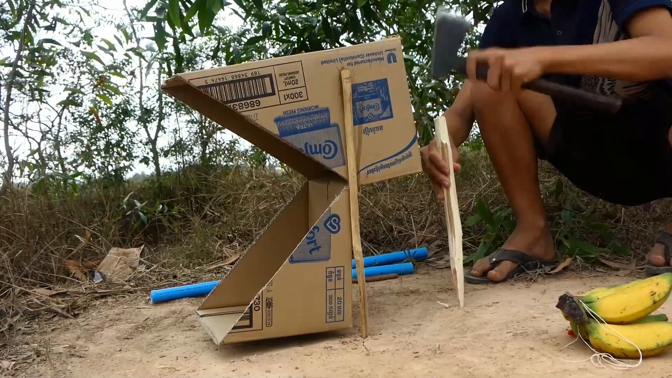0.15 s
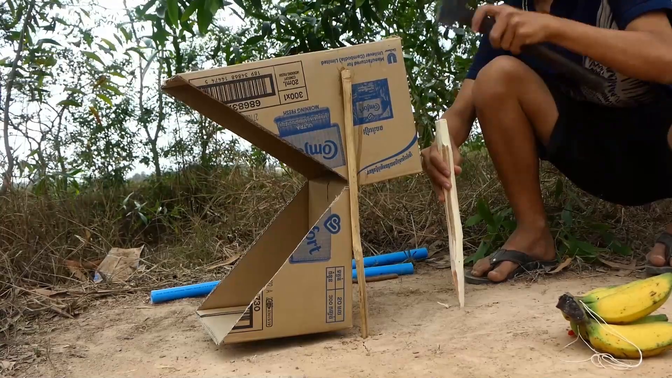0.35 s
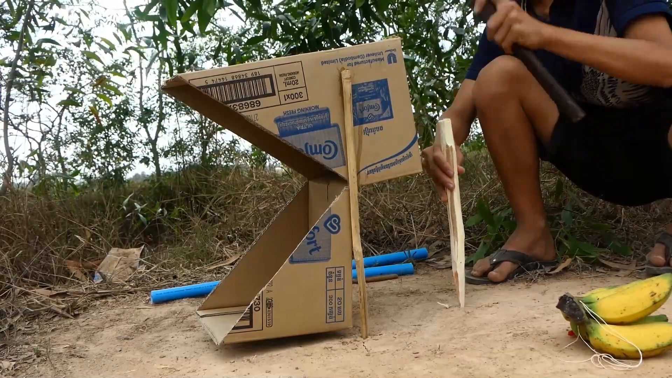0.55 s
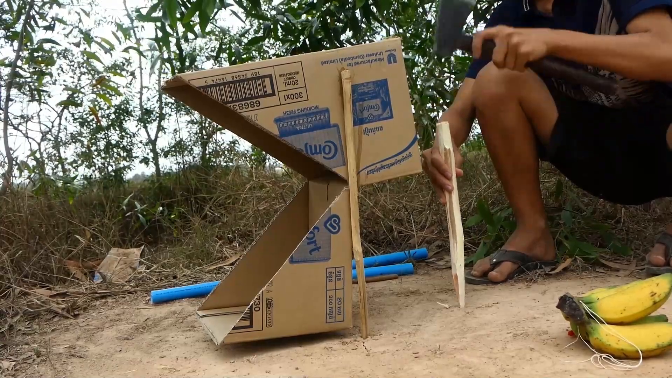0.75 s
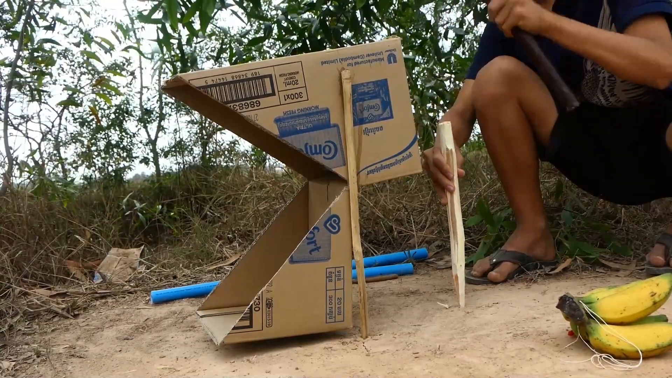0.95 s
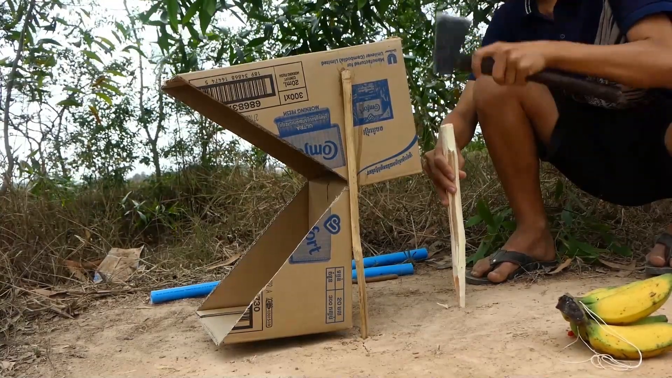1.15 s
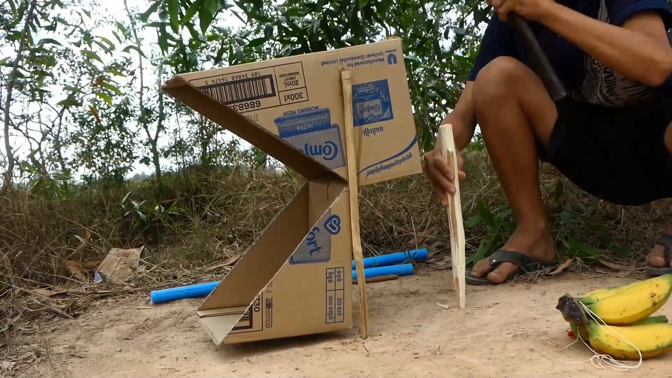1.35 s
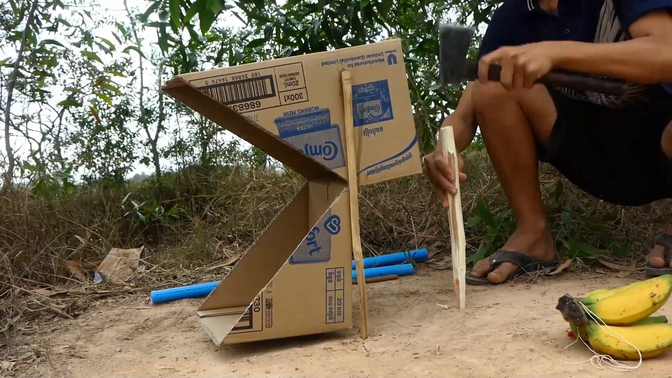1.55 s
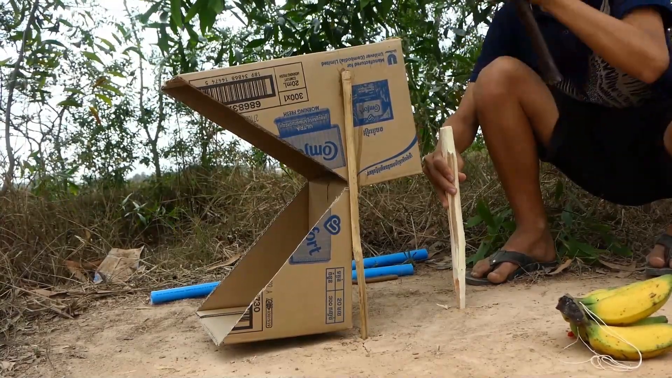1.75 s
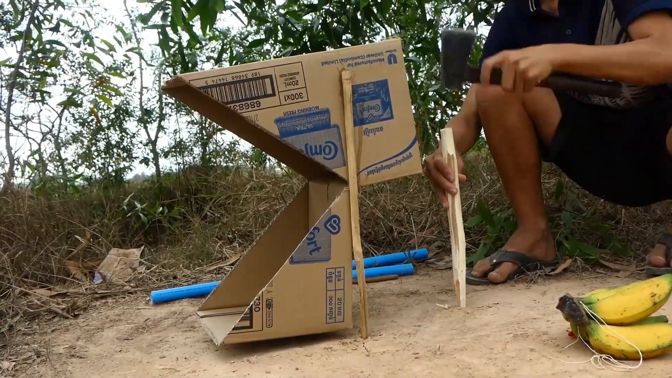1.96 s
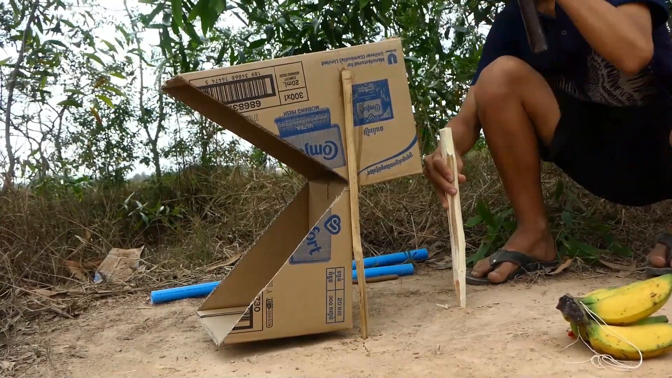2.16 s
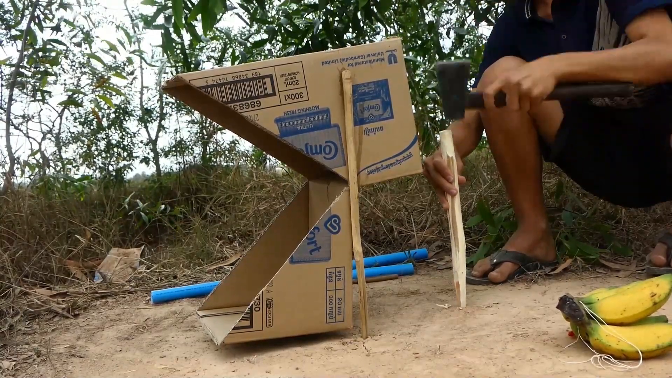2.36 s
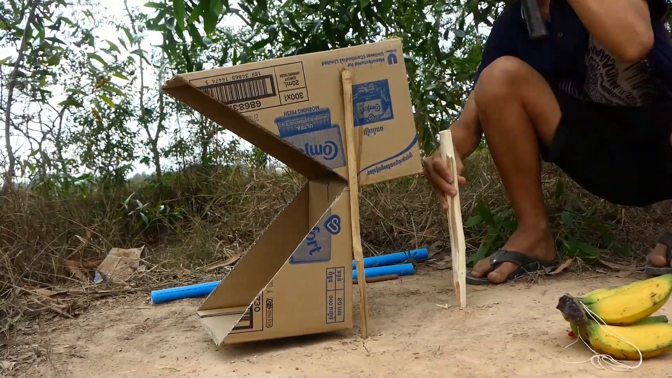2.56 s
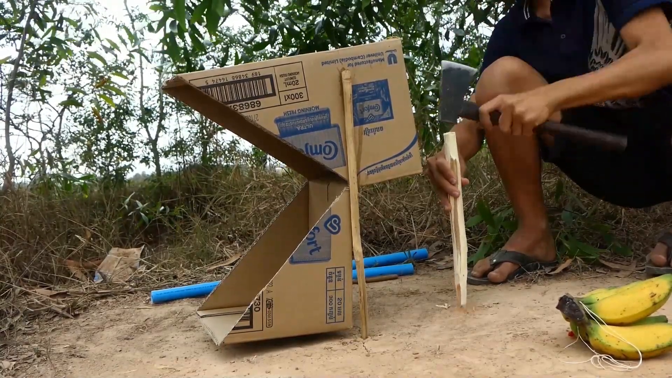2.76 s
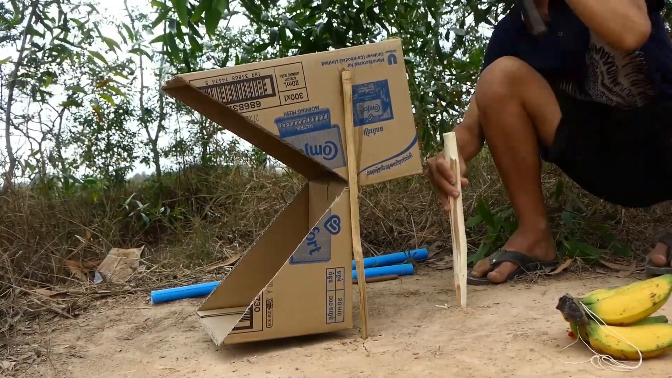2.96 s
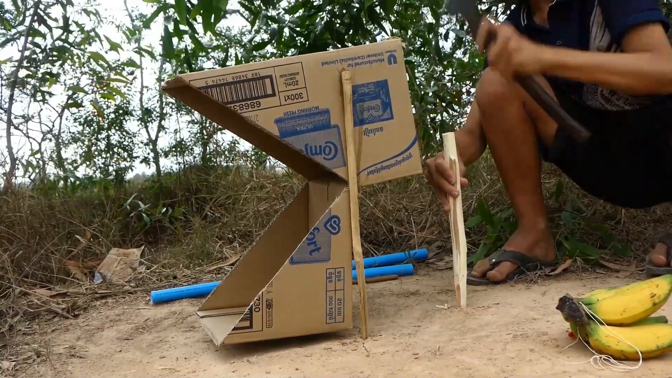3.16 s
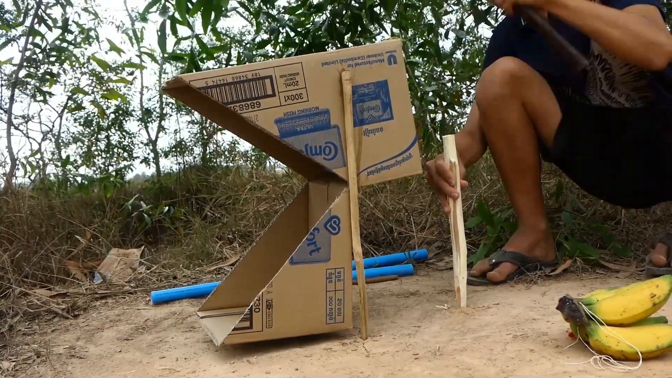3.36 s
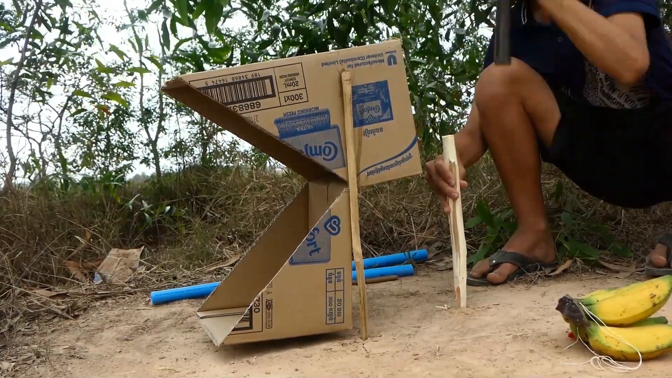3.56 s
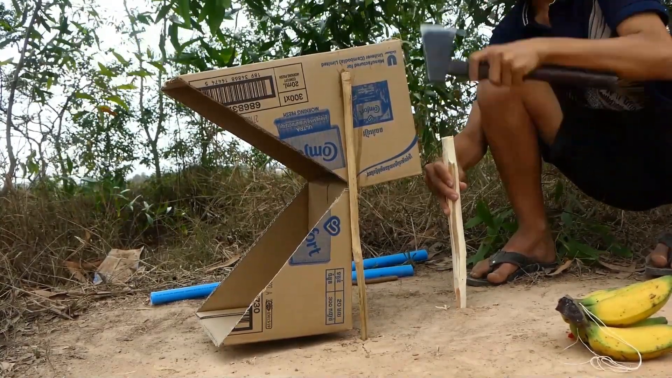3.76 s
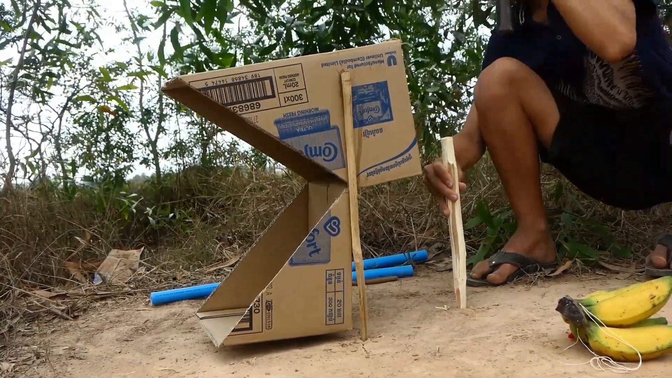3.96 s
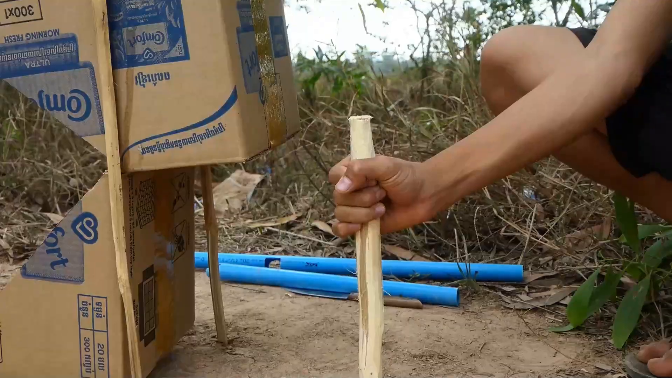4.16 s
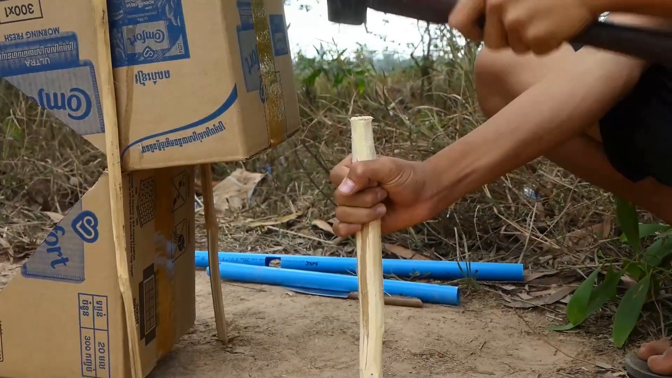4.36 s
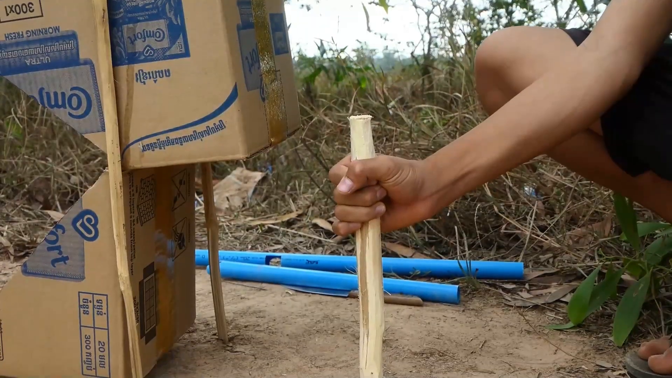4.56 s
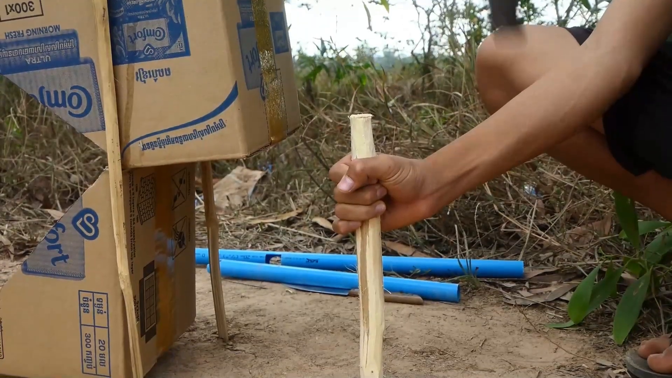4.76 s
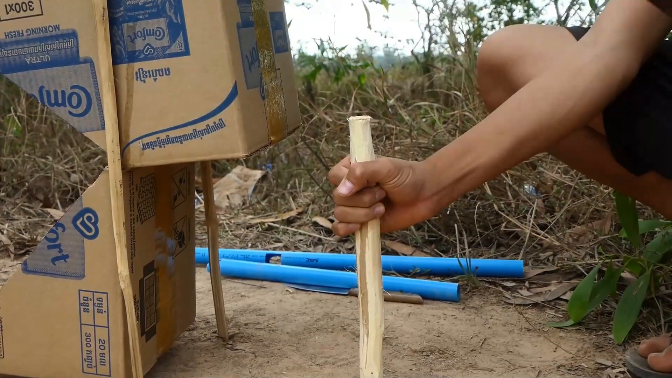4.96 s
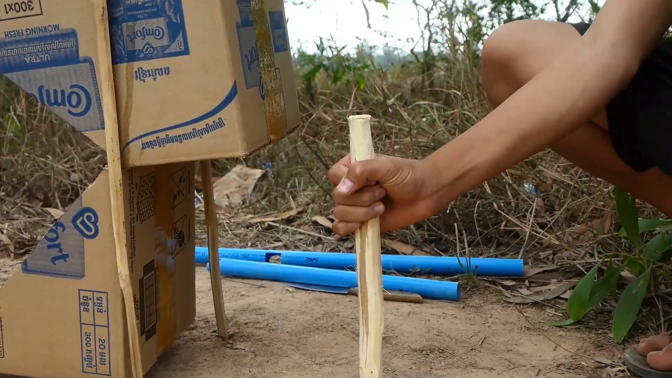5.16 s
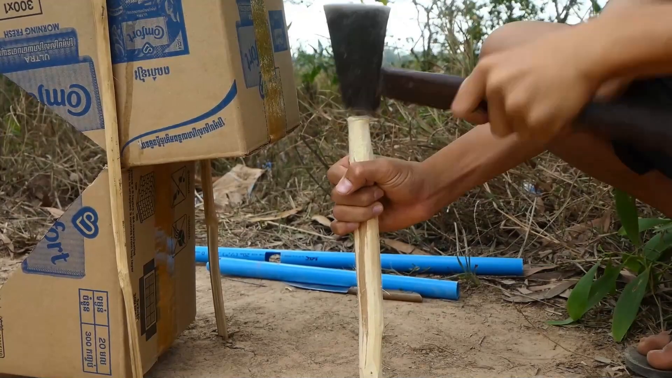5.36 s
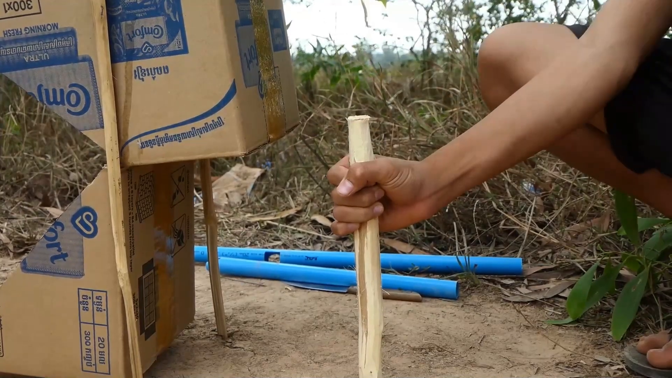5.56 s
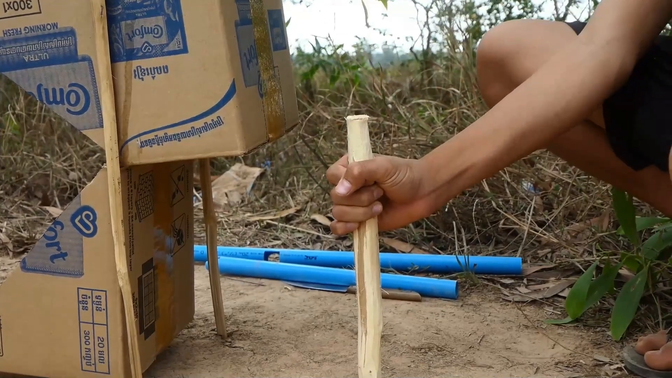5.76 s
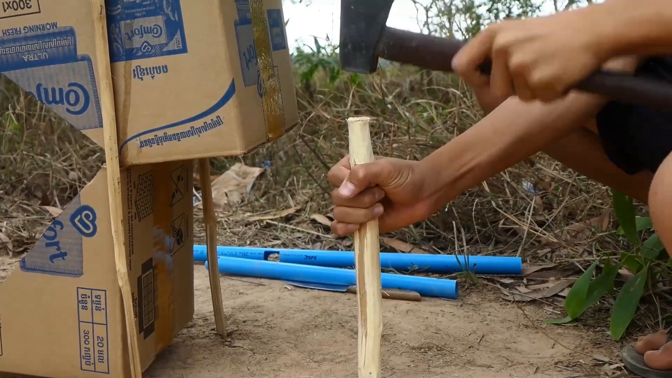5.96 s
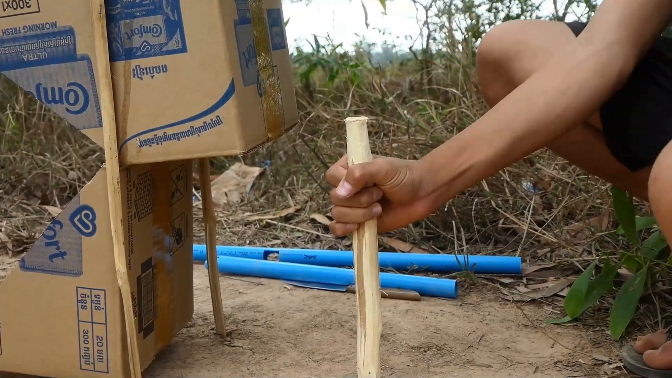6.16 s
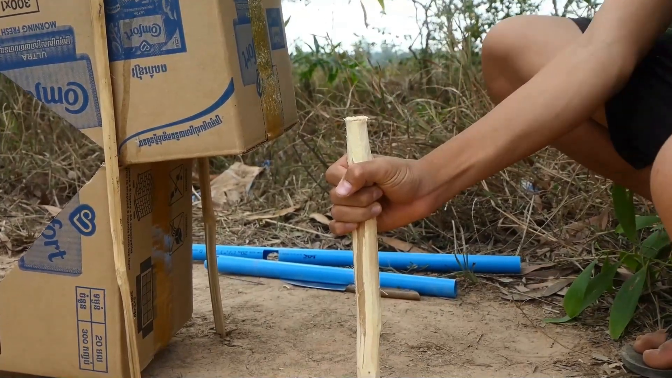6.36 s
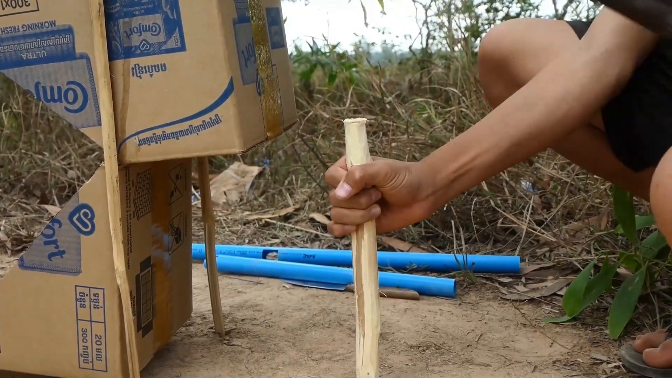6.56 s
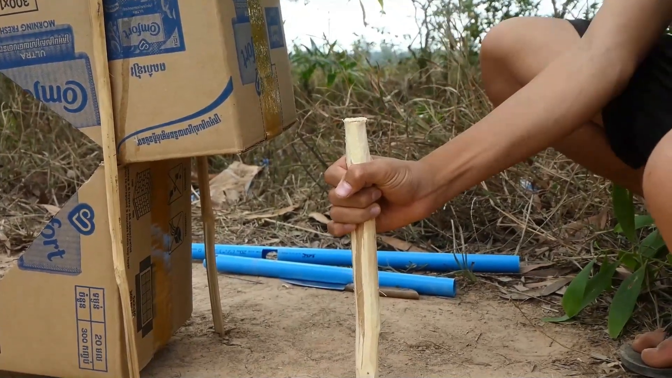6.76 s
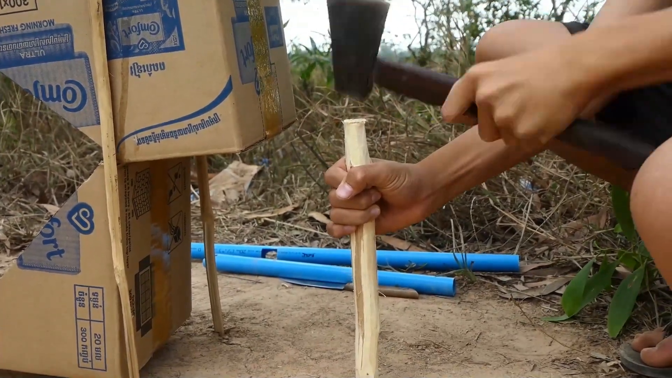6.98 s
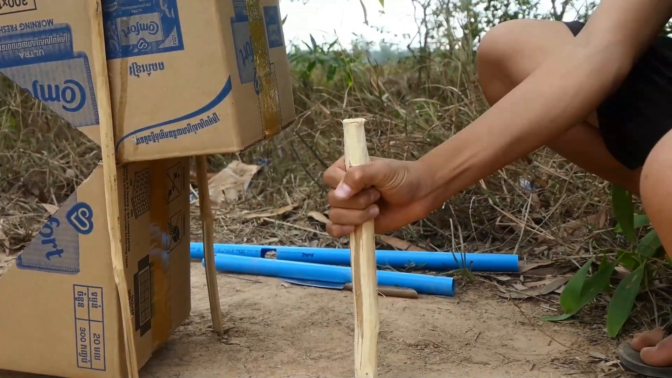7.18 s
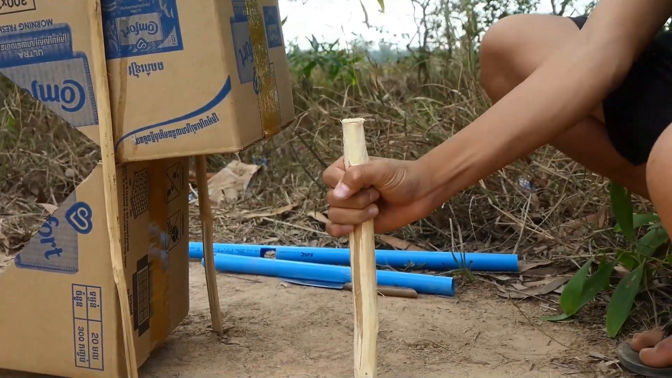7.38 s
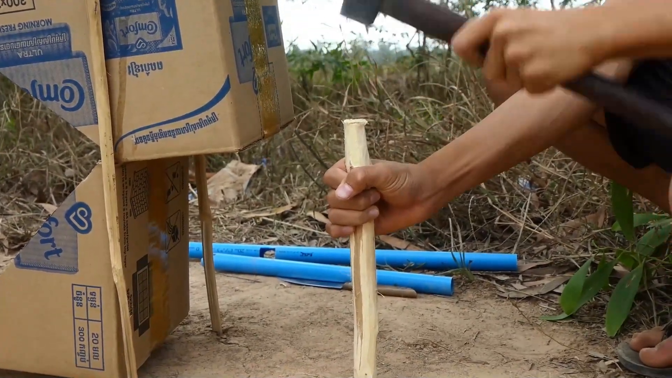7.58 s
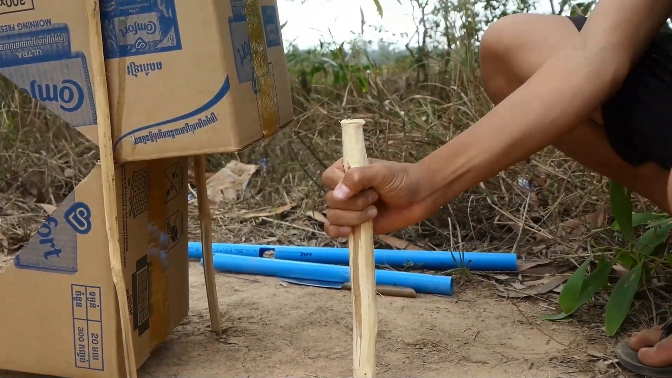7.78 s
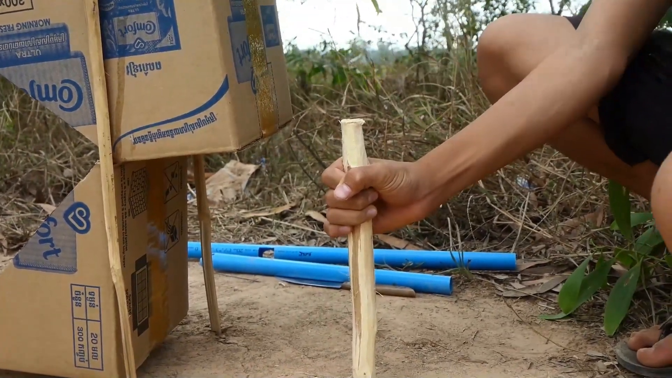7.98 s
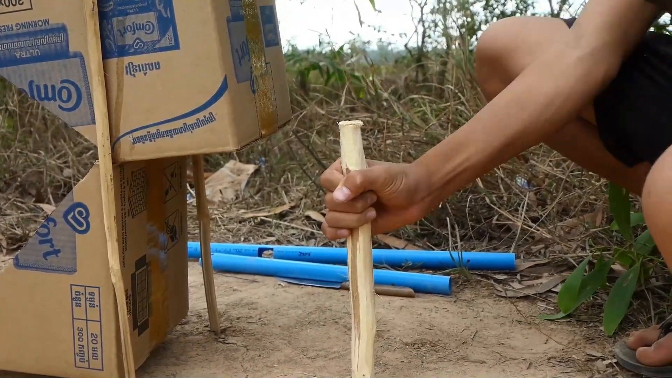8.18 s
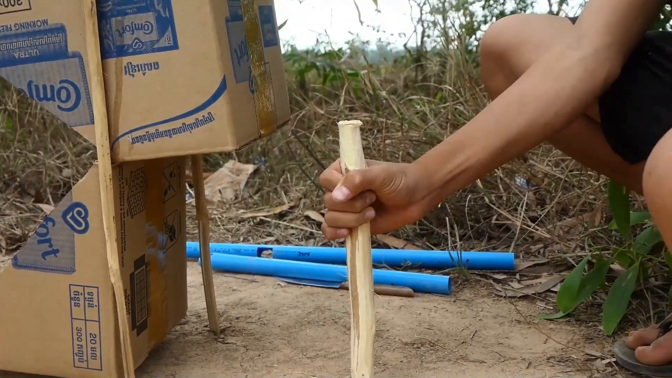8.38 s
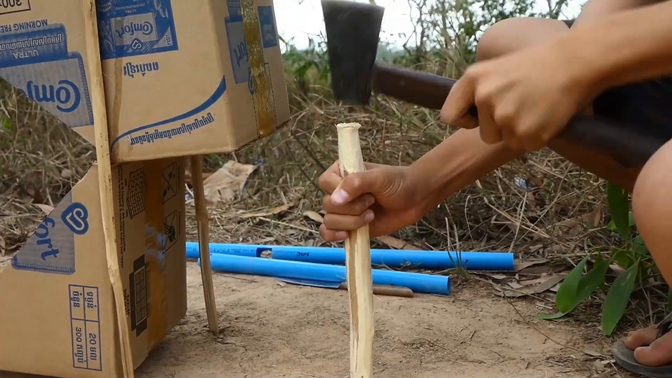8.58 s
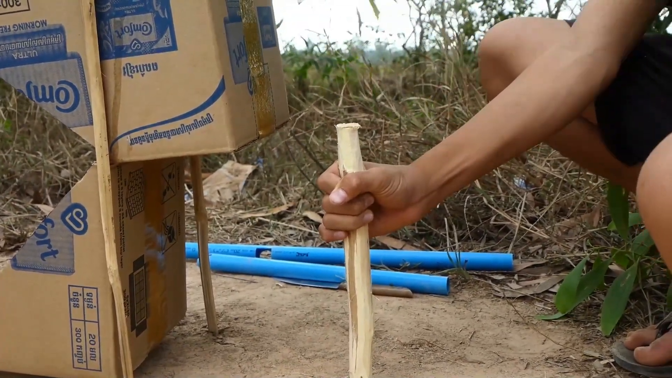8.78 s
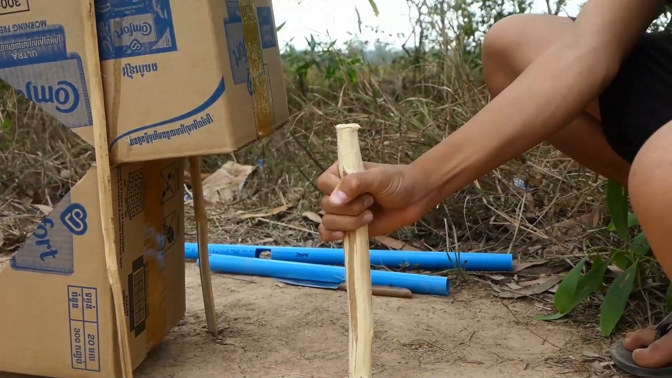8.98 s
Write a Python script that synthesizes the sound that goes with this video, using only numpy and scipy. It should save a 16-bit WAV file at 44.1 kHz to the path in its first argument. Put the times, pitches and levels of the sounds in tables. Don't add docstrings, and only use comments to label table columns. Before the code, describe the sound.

A steel tool strikes a wooden stake about twice a second, close to a small stereo microphone outdoors. Each blow is a dry, bright crack with a brief low soil thud, a quick scattered return from brush and a faint echo from trees. Leaves hiss quietly throughout. After four seconds the view is closer and knocks slow slightly; later, gusts rumble on the microphone and twigs tick.

```python
import sys
import numpy as np
from scipy import signal
from scipy.fft import rfft, irfft
from scipy.io import wavfile
from scipy.ndimage import uniform_filter1d

SR = 44100
rng = np.random.default_rng(int(sys.argv[2]) if len(sys.argv) > 2 else 0)


def log_audio(samples):
    frames = np.atleast_2d(samples).T
    limited = np.clip(frames, -1, 1)
    pcm = np.round(limited * 32767).astype(np.int16)
    wavfile.write(sys.argv[1], SR, pcm)


def volts(x):
    e = np.asarray(x, float) / 20
    return 10 ** e


N = 398223
CUT_S = 4.07

# (time [s], level [dB])
LEAVES_LEVEL = [(0, -55.5), (1.5, -54.5), (3, -55), (4.06, -55.5), (4.08, -54), (5.5, -53), (6.5, -51.5),
                (7.5, -50), (8, -49.5), (8.5, -51.5), (9.03, -51.5)]
# (frequency [Hz], level [dB per Hz])
LEAVES_FAR_TONE = [(260, -35.5), (450, -2), (470, -13), (652, -8), (1160, -6.5), (1740, -14), (2110, -13),
                   (2550, -15.5), (3590, -11.5), (4980, -15), (6600, -18), (10100, -24), (15600, -44.5)]
# (frequency [Hz], level [dB per Hz])
LEAVES_NEAR_TONE = [(260, -30), (450, 4.5), (492, -0.5), (633, -5.5), (734, -3), (931, -1.5), (1370, -4),
                    (2200, -2.5), (5690, -3.5), (10300, -14), (15600, -33.5)]
# (frequency [Hz], likeness [0 to 1])
LEAVES_LIKENESS = [(60, 0.21), (150, 0.21), (380, 0.07), (950, 0.44), (2380, 0.6), (5980, 0.8),
                   (15000, 0.78)]

# (time [s], level [dB])
BREEZE_LEVEL = [(0, -56.5), (0.9, -54.5), (1.4, -51), (3.0, -53.5), (3.6, -50), (4.1, -49.5), (4.4, -60.5),
                (5.1, -70), (6.1, -66.5), (6.5, -54.5), (9.03, -65)]
# (middle [s], half length [s], level [dB], flutter over rumble [dB])
GUSTS = [(4.157, 0.087, -48, -26), (4.35, 0.079, -44.5, -18.5), (4.627, 0.073, -38.5, -18.5),
         (4.895, .03, -45.5, -10.5), (5.2, 0.12, -57, -20), (5.55, .03, -45.5, -20),
         (6.192, 0.027, -40, -17), (6.436, 0.067, -41.5, -15), (6.7, 0.15, -35.5, -10),
         (6.91, .06, -41.5, -7.5), (7.07, 0.046, -41, -7.5), (7.22, .08, -47.5, -7.5),
         (7.436, .04, -33, -11.5), (7.679, .08, -36.5, -3.5), (7.864, 0.24, -38.5, -8.5),
         (8.044, 0.04, -37, 5.5), (8.33, 0.14, -57.5, 17.5), (8.433, 0.14, -57, 15.5),
         (8.601, 0.0523, -56, 14), (8.85, .06, -52, 15.5), (8.943, 0.054, -59, 22.5)]
# (frequency [Hz], level [dB per Hz])
RUMBLE_TONE = [(20, -29), (45, -19), (90, -1.5), (130, 3), (200, -21.5), (400, -57.5)]
# (frequency [Hz], level [dB per Hz])
FLUTTER_TONE = [(80, -34.5), (140, -2.5), (200, 1), (300, -6.5), (450, -21.5), (800, -52.5)]
# (time [s], peak [dB], frequency [Hz], left over right [dB], length [cycles])
PUFFS = [(4.177, -46, 66.4, 3.5, 1.8), (4.6, -52, 133, 0, 1.9), (4.648, -49.5, 107, 5, 6),
         (6.196, -51, 78.1, 4, 4.1), (6.383, -40.5, 135, -1, 2), (6.448, -44.5, 126, 2, 3.1),
         (6.506, -39, 96, -0.5, 2.2), (6.6, -34.5, 106, -3.5, 2), (6.679, -40, 146, 3, 3.1),
         (6.748, -38.5, 142, -1, 3.3), (6.791, -41, 174, 1, 2.1), (6.828, -39.5, 125, 3, 2.9),
         (6.92, -48.5, 152, -3, 2.3), (7.037, -44, 122, 0, 2), (7.42, -39.5, 171, 0.5, 1.2),
         (7.827, -34, 118, -3.5, 1.33), (7.955, -44.5, 146, -8, 2.6), (8.022, -36, 214, -12.5, 2.3),
         (8.041, -37.5, 182, 8.5, 2.3), (8.069, -36.5, 153, 3.5, 1.9), (8.289, -36, 238.7, 13, 2.36),
         (8.802, -45, 258, 9, 2.6)]
# (time [s], peak [dB], frequency [Hz], time to fall 60 dB [s])
SNAPS = [(2.4694, -43, 3840, 0.026), (5.695, -49, 6100, 0.037), (7.8406, -40, 4100, 0.034),
         (7.8594, -43, 4050, 0.03), (7.9399, -29.5, 6100, 0.019), (7.9838, -39, 6000, 0.11),
         (8.0494, -46, 4130, 0.018), (8.1145, -52, 4340, 0.046), (8.3933, -41, 5170, 0.049),
         (8.8294, -46.5, 2560, 0.03), (8.9531, -45, 4000, 0.036)]

# (time [s], strength [dB], second mode [Hz], second mode over first [dB], third mode [Hz])
KNOCKS = [(0.284, 2, 2400, -7, 3390), (0.73, 3.5, 2440, -7, 3330), (1.144, 1, 2580, -3, 3336),
          (1.56, 3.5, 2700, -5.5, 3520), (1.97, 1.5, 2355, 3, 4080), (2.409, -3, 2330, 6.5, 3780),
          (2.843, 4.5, 2730, -3.5, 2940), (3.312, 3.5, 2735, 4, 2900), (3.775, 0, 2090, 1, 3746),
          (4.395, -1, 2946, 2, 2950), (4.934, 2.5, 2265, -5, 3180), (5.476, -1, 3030, 2, 3044),
          (6.013, 0.5, 3155, -8.5, 3200), (6.552, -2.5, 3250, 1.5, 3350), (7.088, 0.5, 3010, 1.5, 3166),
          (7.635, 3.5, 2250, -20.5, 3256), (8.16, -2, 3000, 5.5, 3100), (8.69, -3, 2933, 4, 3164)]
# (steel crack [dB], thud [dB], thud [Hz], far echo [dB])
ANSWERS = [(-14.5, -24.5, 320, -67), (-11.5, -25.5, 162, -62.5), (-14, -16.5, 224, -58),
           (-12.5, -15, 234, -55.5), (-8.5, -17, 227, -53), (-9.5, -17.5, 226, -53), (-13, -15, 223, -53.5),
           (-13, -14, 227, -50.5), (-12, -12.5, 229, -58), (-8, -15, 214, -51.5), (-10, -16, 211, -50),
           (-7, -19, 290, -52.5), (-9, -14.5, 230, -51.5), (-9, -14, 218, -50), (-8.5, -16, 251, -53.5),
           (-11.5, -17, 205, -54), (-8.5, -18.5, 287, -53), (-7, -22, 240, -53)]
# (frequency [Hz], level [dB per Hz])
CRACK_TONE = [(1180, -31), (2200, -6.5), (3310, -10.5), (4600, -9), (5620, -15), (10100, -25.5),
              (13500, -34.5), (16500, -63.5)]
# (frequency [Hz], level [dB per Hz])
SOIL_TONE = [(50, -21), (100, -1), (250, 4.5), (350, -3), (550, -16.5), (1200, -45.5)]
# (frequency [Hz], time to fall 60 dB [s])
BRUSH_FADE = [(200, .09), (600, 0.16), (1500, 0.065), (3000, 0.11), (6000, 0.19), (9000, 0.056),
              (13000, .03)]
# (frequency [Hz], level [dB])
BRUSH_TONE = [(300, -15.5), (900, -1.5), (1700, 0), (2800, 2.5), (5000, -8), (9000, -13), (14000, -30.5),
              (17000, -45)]
# (frequency [Hz], level [dB])
SLAP_TONE = [(600, -24), (1300, 12), (3000, 10), (4500, -20), (7000, -34)]

FIRST_HZ, STAKE_T60_S = (1860, 1610), (0.0055, 0.0082)
MIDDLE_HZ, MIDDLE_DB = (2120, 2184), (-11, -12)
BEND_DB, THIRD_DB = (-12.5, -13.5), (-6, -3)
BOUNCE_DB, PAN_DB = (-20, -10.5), (-2.4, 1.6)
THUD_LATE_S, THUD_CYCLES, DEEP_DB = (0.0038, 0.0028), (2.3, 1.3), (-25.5, -29)
BRUSH_DB, SLAP_DB, UPPER_ECHO_DB = (-6.5, -5), (-59.5, -49.5), (-9.5, -20)
ECHO_START_DB, ECHO_START_T60_S = (9.5, 13.5), (0.5, 0.27)
ECHO_PEAK_S, ECHO_NARROW_DB = (0.11, 0.12), (18.5, 48)


def evened(x):
    return x / np.sqrt(np.mean(x ** 2) + 1e-20)


def read(points, hz):
    f, value = np.transpose(points)
    return np.interp(np.log(hz + 1), np.log(f + 1), value)


def level_over_time(points, t):
    return volts(np.interp(t, *np.transpose(points)))


def add(mix, s, sound):
    part = mix[:, round(s * SR):][:, :sound.shape[-1]]
    part += sound[..., :part.shape[1]]


def sides(pan_db):
    return volts([[pan_db / 2], [-pan_db / 2]])


def fade_in(t, rise):
    return 1 - np.exp(-t / rise)


def ring(t, hz, t60, rise):
    t = np.maximum(t, 0)
    return np.sin(2 * np.pi * hz * t) * volts(-60 * t / t60) * fade_in(t, rise)


def coloured(x, points):
    size = x.shape[-1]
    return irfft(rfft(x) * volts(read(points, np.fft.rfftfreq(size, 1 / SR))), size)


def stereo_pair(parts, likeness):
    a, b, c, d = parts
    left, own = a + 1j * b, c + 1j * d
    return np.array([left, likeness * left + np.sqrt(1 - likeness ** 2) * own])


def smooth_patches(noise, hz_bins, frames):
    return evened(uniform_filter1d(uniform_filter1d(noise, size=hz_bins, axis=0), size=frames, axis=1))


def leaves():
    frames, hz = N // 128 + 5, np.fft.rfftfreq(512, 1 / SR)
    t = np.arange(frames) * 128 / SR
    *parts, noise = rng.standard_normal((frames, 257, 5)).T
    flicker = evened(uniform_filter1d(noise.sum(0), size=5))
    patches = smooth_patches(noise, 6, 20)
    likeness = np.clip(read(LEAVES_LIKENESS, hz), -1, 1)[:, None]
    z = stereo_pair(parts, likeness)
    far = evened(volts(read(LEAVES_FAR_TONE, hz)))[:, None]
    near = evened(volts(read(LEAVES_NEAR_TONE, hz)))[:, None]
    z *= np.where(t < CUT_S, far, near) * volts(1.1 * patches + 0.55 * flicker)
    z *= (hz < 15700)[:, None]
    hiss = evened(signal.istft(z, nperseg=512, noverlap=384)[1][:, :N])
    return level_over_time(LEAVES_LEVEL, np.arange(N) / SR) * hiss


def wind():
    frames, hz = N // 256 + 5, np.fft.rfftfreq(1024, 1 / SR)
    t = np.arange(frames) * 256 / SR
    middle_s, half_s, gust_db, flutter_db = np.transpose(GUSTS)
    swell = np.exp(-((t[:, None] - middle_s) / half_s) ** 2) * volts(gust_db)
    breeze = level_over_time(BREEZE_LEVEL, t)
    *parts, noise = rng.standard_normal((frames, 513, 5)).T
    lumps = smooth_patches(noise, 4, 4)
    deep_level = np.hypot(np.hypot(breeze, swell.max(1)), volts(-59.5))
    flutter_gust = (swell * volts(flutter_db)).max(1)
    flutter_level = np.hypot(np.hypot(breeze * volts(-2), flutter_gust), volts(-59.0))
    deep = evened(volts(read(RUMBLE_TONE, hz)))[:, None] * deep_level
    flutter = evened(volts(read(FLUTTER_TONE, hz)))[:, None] * flutter_level
    z = stereo_pair(parts, 0.72) * volts(2.9 * lumps)
    z = z / np.sqrt(np.mean(abs(z) ** 2)) * np.hypot(deep, flutter)
    return 39.5 * sides(1.3) * signal.istft(z, nperseg=1024, noverlap=768)[1][:, :N] / 512


def puffs():
    out = np.zeros((2, N))
    for s, db, hz, pan_db, cycles in PUFFS:
        t = np.arange(round(cycles / hz * SR)) / SR
        port_lag = np.array([[0], [0.34 * rng.standard_normal()]])
        phase = rng.uniform(0, 2 * np.pi) + port_lag
        wave = np.sin(2 * np.pi * hz * t + phase) * np.hanning(len(t))
        add(out, s, volts(db + 12.0) * sides(pan_db) * wave)
    return out


def jolt():
    s, peak_db, half_width_s = 7.445, -23, 0.004
    u = (np.arange(N) / SR - s) / half_width_s
    return -volts(peak_db) * (1 - u - u ** 2) * np.exp(-u ** 2 / 2)


def snaps():
    out, t = np.zeros((2, N)), np.arange(4000) / SR
    for s, db, hz, t60 in SNAPS:
        noise = rng.standard_normal(len(t)) + 0.44 * rng.standard_normal((2, len(t)))
        tone = [(hz / 4, -22), (hz * 1.1, -6), (hz, 0), (hz * 0.85, -6),
                (11000, -22), (15500, -45), (16500, -70)]
        add(out, s, volts(db - 60 * t / t60) * evened(coloured(noise, tone)))
    return out


def scatter(tone, level_db, size):
    same, own = rng.standard_normal(size), rng.standard_normal((2, size))
    hz, t, z = signal.stft(same + 0.13 * own, SR, nperseg=192)
    z = z * evened(volts(read(tone, hz)))[:, None] * volts(level_db(hz[:, None], t))
    z /= 1 + (hz[:, None] / 10500) ** 10
    return signal.istft(z, SR, nperseg=192)[1]


def tree_echo(view, high_hz, top_hz):
    echo_hz, upper_db = (max(high_hz, 2420), top_hz)[view], UPPER_ECHO_DB[view]
    tone = [(echo_hz * 0.5, -24), (echo_hz * 0.83, -14), (echo_hz, 0), (echo_hz * 1.1, -13)]
    tone += [(3680, upper_db - 2), (3950, upper_db + 8), (4350, upper_db - 1), (6200, -15), (9000, -40)]

    def late_db(hz, t):
        build = -ECHO_NARROW_DB[view] * np.log2((t + 0.001) / ECHO_PEAK_S[view]) ** 2
        start = ECHO_START_DB[view] - 60 * t / ECHO_START_T60_S[view]
        return np.maximum(build, start)

    return scatter(tone, late_db, size=16384)


def brush_return(high_hz, top_hz):
    def level_db(hz, t):
        lift = sum(np.exp(-((hz - f) / 169) ** 2) for f in (high_hz, top_hz, 5120))
        return 2.5 * lift - 60 * t / read(BRUSH_FADE, hz)

    return scatter(BRUSH_TONE, level_db, size=6144)


def soil_thud(t, view, thud_db, thud_hz):
    late = np.maximum(t - THUD_LATE_S[view], 0)
    hold = fade_in(late, 0.0024) * np.exp(-(late * thud_hz / THUD_CYCLES[view]) ** 2)
    soil = volts(thud_db) * hold * np.sin(2 * np.pi * thud_hz * late + np.array([[0.2], [-0.2]]))
    soil += volts(DEEP_DB[view]) * ring(late, 110, 0.086, 0.0041)
    shaken = rng.standard_normal(len(t)) + 0.5 * rng.standard_normal((2, len(t)))
    rumble = evened(coloured(shaken, SOIL_TONE)) * volts(-60 * late / 0.13) * fade_in(late, 0.001)
    return volts(5.5) * (soil * sides(1.1) + volts(thud_db - 12) * rumble)


def stake_wood(t, view, db, high_hz, high_db, top_hz):
    t60 = STAKE_T60_S[view]
    wood = ring(t, FIRST_HZ[view], t60, 0.0004)
    wood += volts(high_db) * ring(t, high_hz, 1.39 * t60, 0.00088)
    wood *= volts(db)
    wood += volts(BEND_DB[view] + 2.5) * ring(t, 1000, 0.0092, 0.00066)
    wood += volts(THIRD_DB[view]) * ring(t, top_hz, 0.0084, 0.001)
    wood += volts(-13.5) * ring(t, 1200, 0.013, 0.00077)
    wood += volts(MIDDLE_DB[view]) * ring(t, MIDDLE_HZ[view], 0.017, 0.0018)
    return -volts(3) * wood


def steel_crack(t, crack_db):
    grit = evened(coloured(rng.standard_normal(len(t)), CRACK_TONE))
    after = np.maximum(t, 0)
    return volts(crack_db + 8) * grit * volts(-60 * after / 0.0077) * fade_in(after, 0.00027)


def steel_ring(t, crack_db):
    steel = ring(t, 5120, 0.065, 0.001) + volts(-4) * ring(t, 3480, 0.06, 0.001)
    return volts(crack_db - 21) * steel


def knock(blow, answer, view):
    _, db, high_hz, high_db, top_hz = blow
    crack_db, thud_db, thud_hz, _ = answer
    t = np.arange(6000) / SR - 0.0005
    wood = stake_wood(t, view, db, high_hz, high_db, top_hz)
    crack = steel_crack(t, crack_db)
    steel = steel_ring(t, crack_db)
    bounced = np.roll(wood + 0.067 * crack, round(0.001182 * SR))
    bounce = volts(BOUNCE_DB[view]) * bounced * sides(-13.0)
    ground = soil_thud(t, view, thud_db, thud_hz)
    return (wood + crack + steel + bounce) * sides(PAN_DB[view]) + ground


def knocks():
    out = np.zeros((2, N))
    for blow, answer in zip(KNOCKS, ANSWERS):
        s, db, high_hz, _, top_hz = blow
        view = int(s > CUT_S)
        add(out, s, knock(blow, answer, view))
        add(out, s + 0.0038, volts(BRUSH_DB[view] - 25.5) * brush_return(high_hz, top_hz))
        add(out, s + 0.0071, volts(answer[3]) * tree_echo(view, high_hz, top_hz))
        slap = scatter(SLAP_TONE, lambda hz, t: -60 * t / 0.13 + 0 * hz, size=4096)
        add(out, s + 0.119, volts(db + SLAP_DB[view]) * slap)
    return out


def scene():
    return leaves() + wind() + puffs() + jolt() + snaps() + knocks()


def band_limit(x):
    return signal.sosfilt(signal.butter(12, 16740, fs=SR, output="sos"), x)


def record(dry):
    power = signal.lfilter([0.004], [1, -0.996], (dry ** 2).mean(0))
    power_db = 10 * np.log10(abs(power) + 1e-12)
    loud = np.clip((power_db + 26) / 4, 0, 1)
    depth_db = np.where(np.arange(N) / SR < CUT_S, 32.0, 62.0)
    keep = np.exp(-1 / (0.13 * SR))
    duck_db = signal.lfilter([1 - keep], [1, -keep], depth_db * loud)
    duck_db = signal.lfilter([0.0025], [1, -1 + 0.0025], duck_db)
    bass_cut = signal.butter(2, 50, "high", fs=SR, output="sos")
    ducked = signal.sosfilt(bass_cut, dry) / volts(duck_db)
    squeezed = 0.92 * ducked / (1 + abs(ducked) ** 8) ** (1 / 8)
    treble_edge = signal.firwin(255, 16300, fs=SR)[None]
    mix = signal.oaconvolve(squeezed, treble_edge, "same")
    return band_limit(mix)


dry = scene()
out = record(dry)
log_audio(out)
```